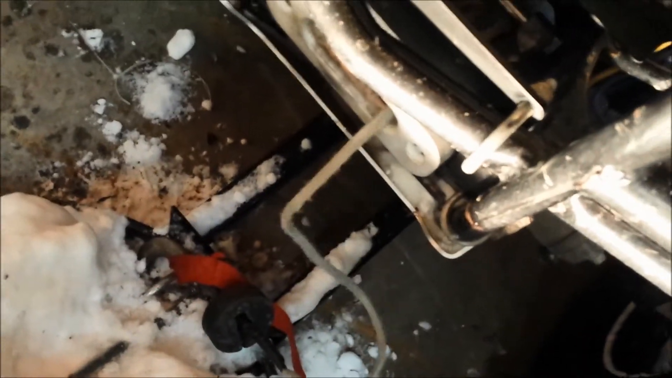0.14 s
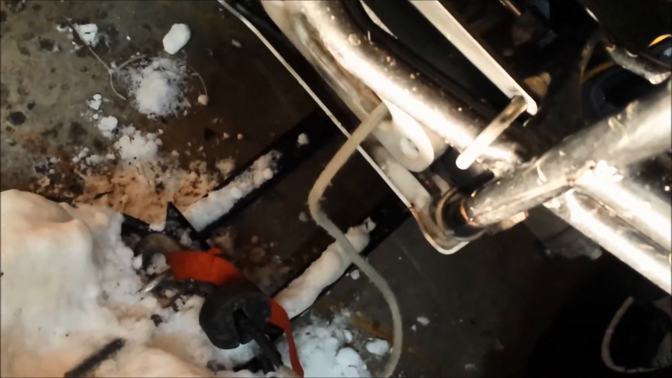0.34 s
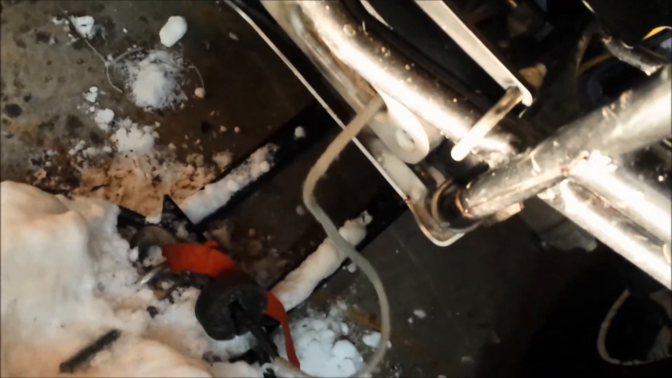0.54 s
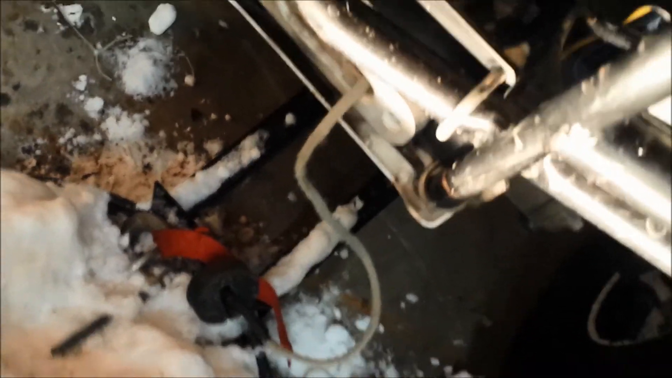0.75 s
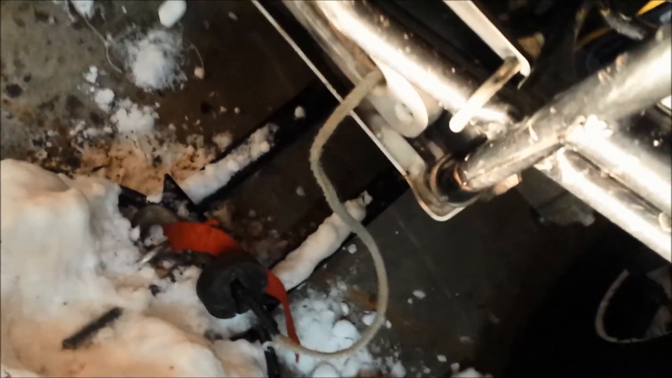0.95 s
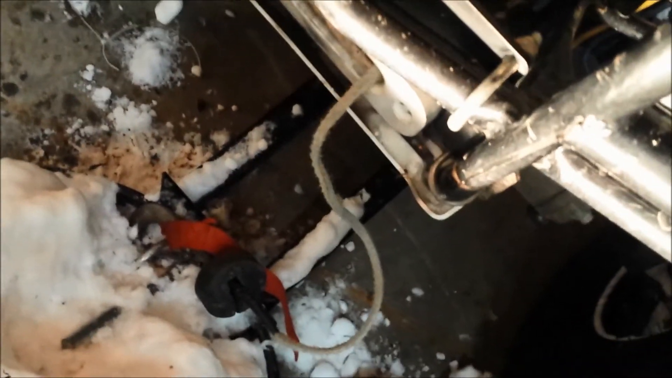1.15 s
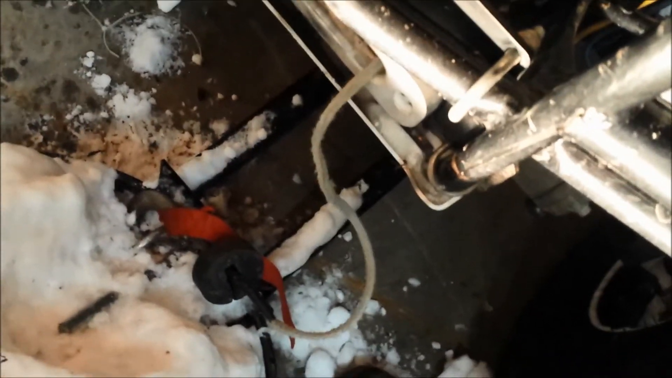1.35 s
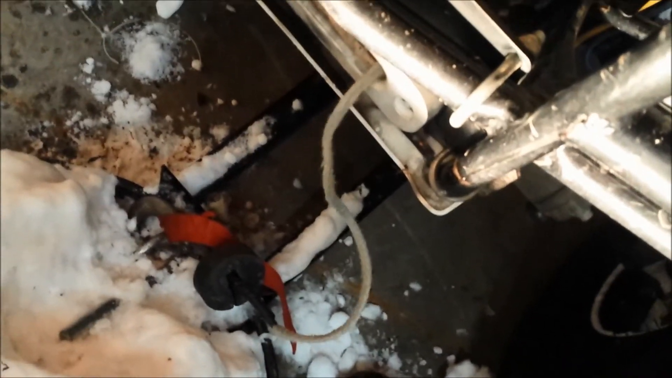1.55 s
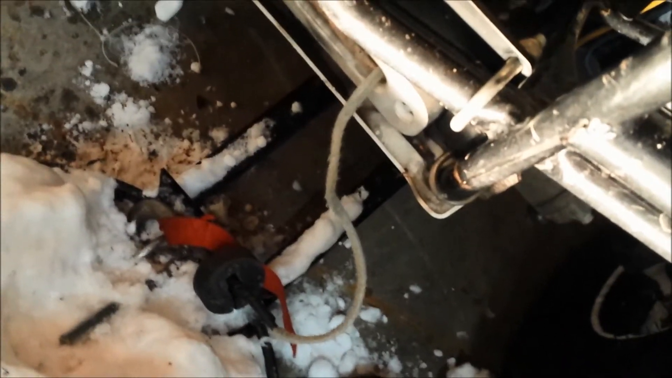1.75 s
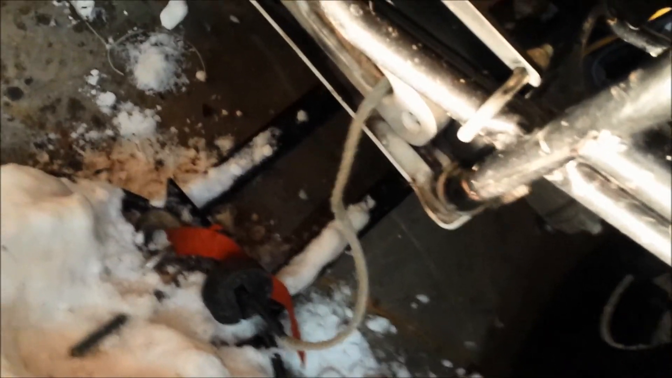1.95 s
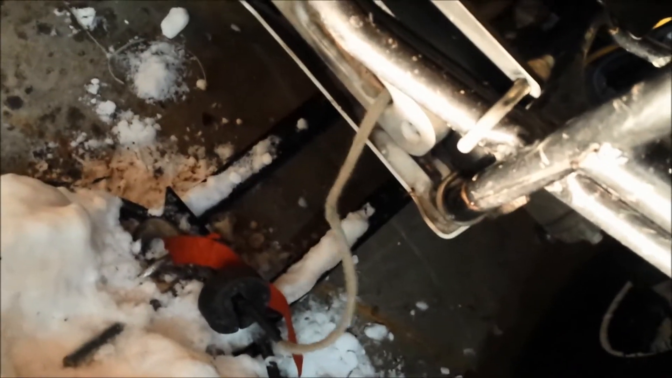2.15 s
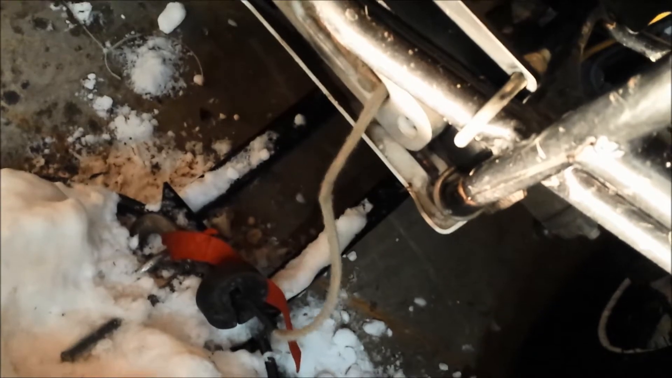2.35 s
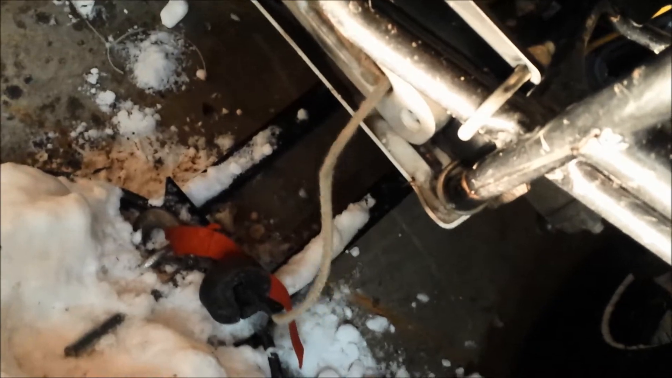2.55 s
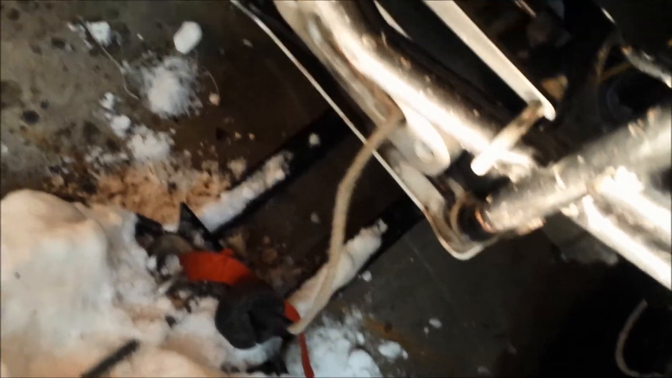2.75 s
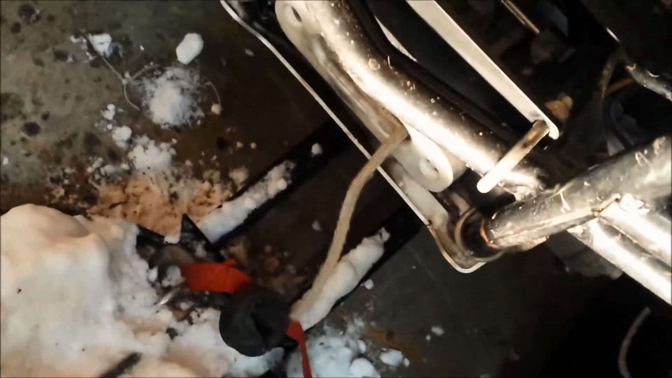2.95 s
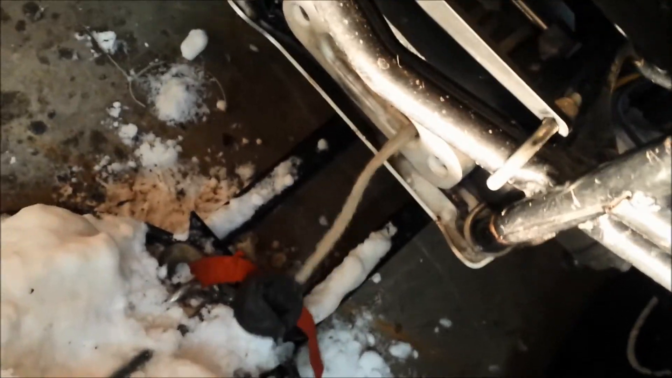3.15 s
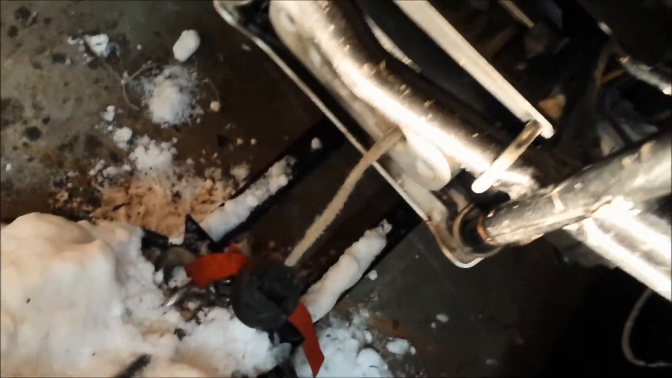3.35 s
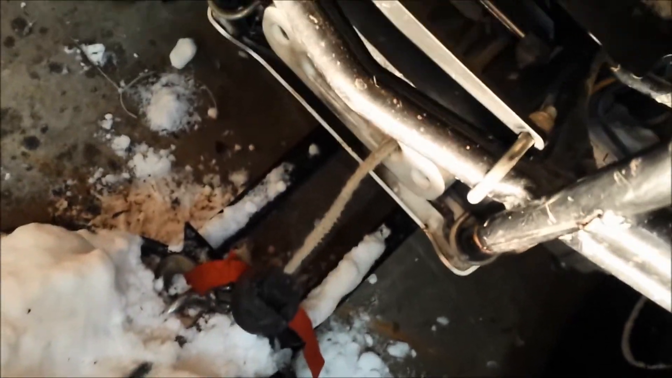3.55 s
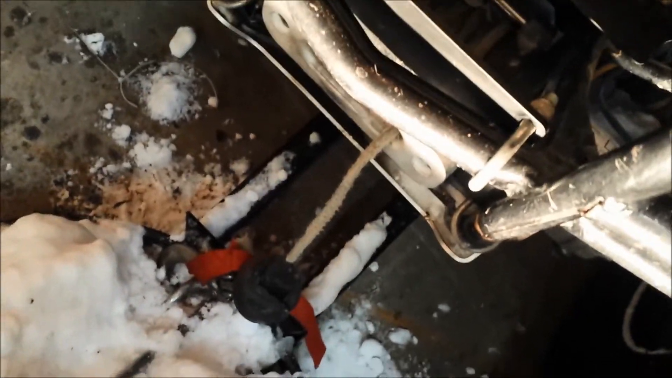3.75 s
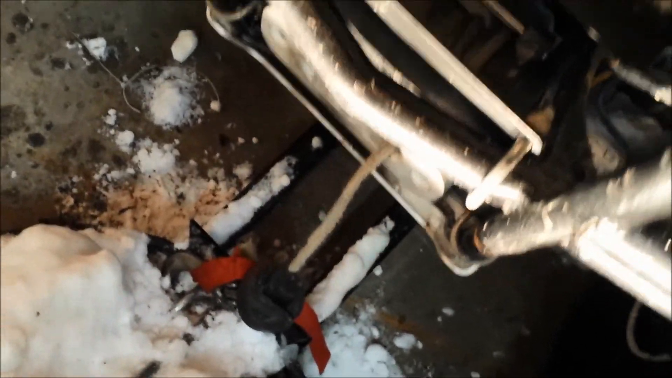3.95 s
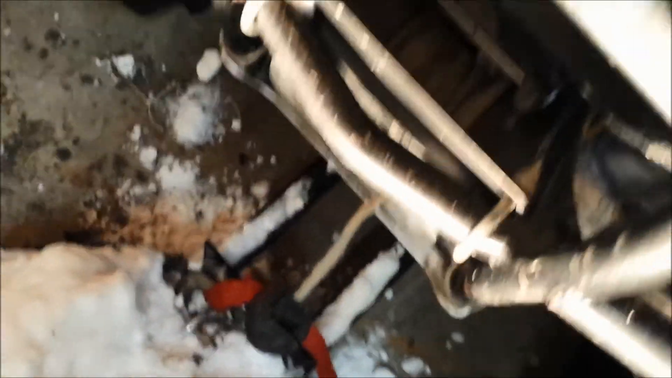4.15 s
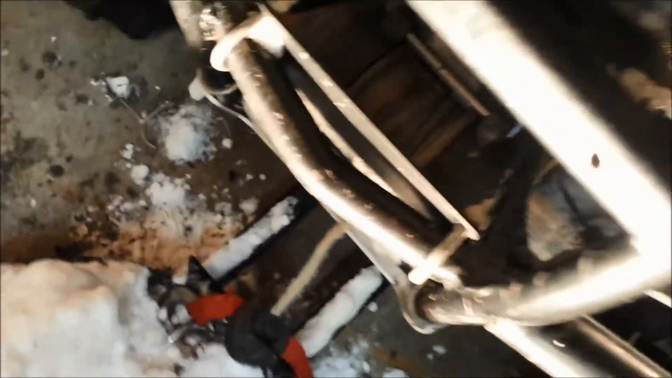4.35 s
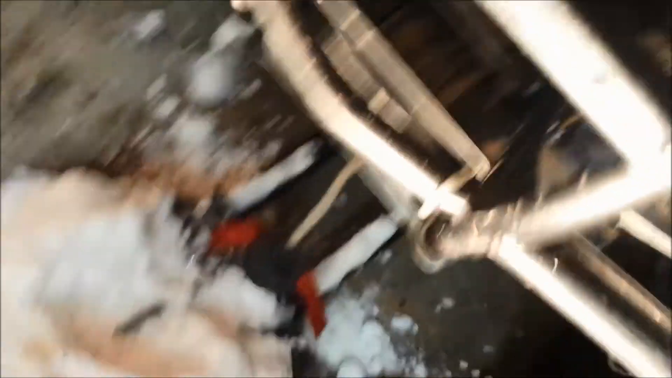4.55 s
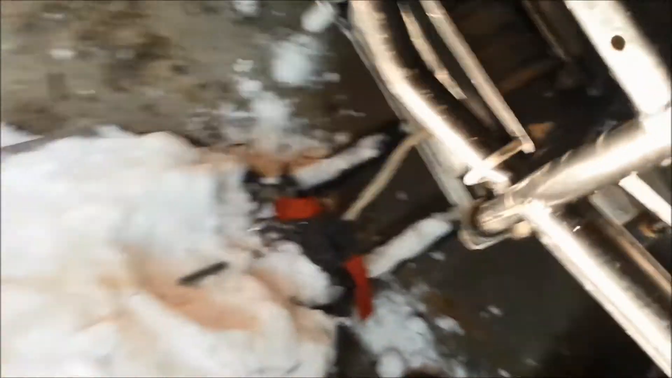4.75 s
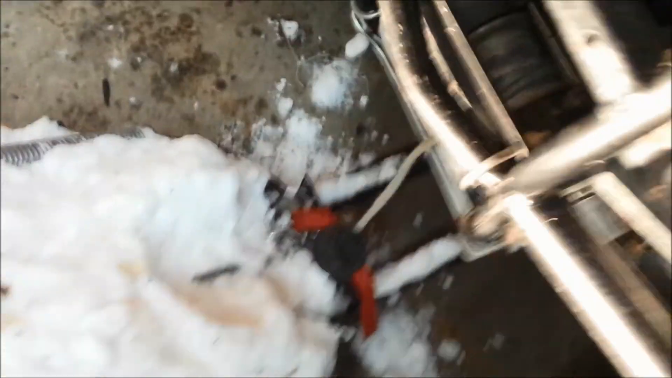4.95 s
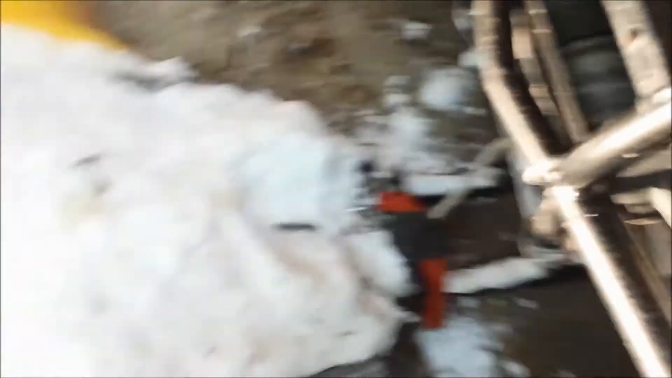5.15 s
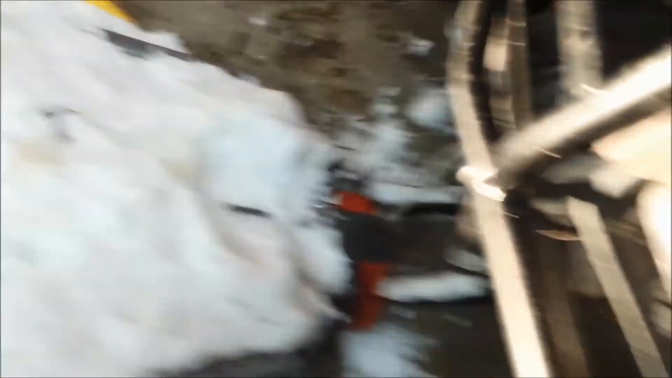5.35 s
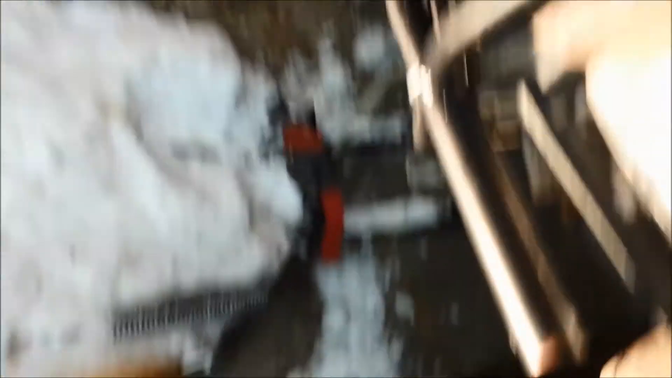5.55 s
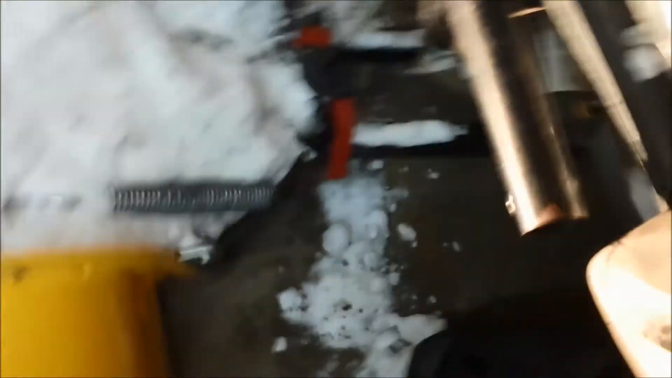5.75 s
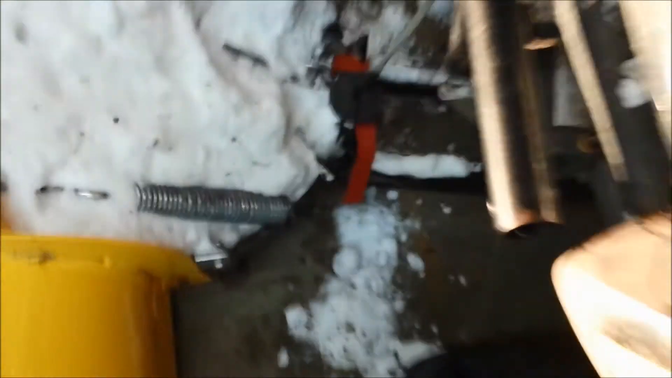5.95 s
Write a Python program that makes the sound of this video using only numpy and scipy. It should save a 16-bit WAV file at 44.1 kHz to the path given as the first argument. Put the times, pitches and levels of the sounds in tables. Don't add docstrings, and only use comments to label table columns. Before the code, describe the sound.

An electric winch whines and grinds steadily as rope ticks onto its drum, stops dead, then quiet cloth rustle and a few scuffs and knocks.

```python
import sys
import numpy as np
from scipy import signal
from scipy.fft import rfft, irfft, next_fast_len
from scipy.io import wavfile
from scipy.ndimage import map_coordinates

SR = 44100
rng = np.random.default_rng(int(sys.argv[2]) if len(sys.argv) > 2 else 0)


def inscribe(sig):
    pcm = np.round(np.clip(np.atleast_2d(sig).T, -1, 1) * 32767)
    wavfile.write(sys.argv[1], SR, pcm.astype(np.int16))


def nominal_scale(level):
    x = np.asarray(level, float) / 20
    return 10 ** x


N = 264149
T = np.arange(N) / SR

STOP_S = 3.3625
TEETH = 11.35
MOTOR_DB, DRUM_DB, HOUSING_DB = -32.5, -9, -5
# (time [s], speed [turns/s])
SHAFT_SPEED = [
    (0, 44.9),
    (.46, 45.15),
    (.9, 44.8),
    (1.6, 44.85),
    (2.1, 45.6),
    (2.5, 45.85),
    (2.8, 45.95),
    (3.1, 45.45),
    (3.4, 45),
]
# (place [share of a turn], level [dB])
HIGH_SPOTS = [(.08, 8.5), (.37, -6), (.6, -1), (.9, -3)]
# (time [s], rumble level [dB])
ROPE_PULL = [
    (0, 2.5),
    (.7, 0.5),
    (1.3, 1),
    (1.9, -0.5),
    (2.3, -2),
    (2.8, 1.5),
    (3.1, 0.5),
    (3.4, 2.5),
]
# (multiple of the tooth rate [-], level [dB], left-right [dB], left lead [rad], blur [Hz])
WHINE_TONES = [(.986, -43, 0, .1, 5), (1.17, -53, -6, .9, 10), (2.001, -46.5, -14, .2, 5.5),
               (3.018, -45, -5, 4.1, 5), (4.12, -56, -4, 5.9, 20)]
WHINE_TURNED_DB = [1, 1.5, 1, 5.5, 5.5]
WHINE_FOLLOWS = [1, 1, 1, .3, 1]
USUAL_TURNS = 45
BEAT, BEAT_DEPTH = .59, .35
# (frequency [Hz], level [dB])
GRIND_COLOUR = [(1200, -27.5), (2000, 6.5), (3000, 3.5), (3700, 6.5), (4500, 1), (6000, 4), (7800, 2.5),
                (8400, -5.5), (9000, -3.5), (10300, 0), (11500, 0), (13000, -14), (13800, -13.5),
                (14700, -36.5)]
# (frequency [Hz], level [dB])
DRUM_COLOUR = [(25, -32), (60, -12), (80, -12), (130, -3.5), (180, -4), (202, -0.5), (230, -3.5),
               (280, -2.5), (380, -10.5), (600, -25.5)]
# (frequency [Hz], width [Hz], level [dB])
HOUSING_MODES = [(463, 43, -2.5), (530, 33, -0.5), (596, 44, -0.5), (640, 79, -2.5), (815, 102, -8.5),
                 (985, 127, -6), (1140, 270, -9), (1450, 65, -4), (1555, 63, 0.5), (1664, 294, -8.5),
                 (2065, 95, -11.5), (2224, 90, -14.5)]
# (frequency [Hz], width [Hz], level [dB])
CASE_BEFORE = [(2900, 150, -1.5), (3950, 150, -7), (4800, 42, 3), (5200, 40, -5), (5200, 88, 0),
               (5810, 70, -2), (5850, 80, -3), (6530, 200, -1), (6960, 77, -5.5), (7210, 150, -1),
               (7680, 100, 3), (8000, 90, 4.5), (9050, 130, -8.5)]
# (frequency [Hz], width [Hz], level [dB])
CASE_AFTER = [(2950, 150, -1.5), (3770, 90, -11.5), (4100, 100, -1), (5440, 88, 0.5), (5800, 150, -2.5),
              (6530, 130, 2), (6720, 91, -3.5), (7320, 200, 3), (7500, 136, 3), (7800, 100, -3.5),
              (9030, 110, 1), (8880, 160, 7.5)]
TURN_S, TURN_LASTS_S = 2.1, 0.43
DIP_HZ, DIP_WIDTH_HZ, DIP_DEPTH = 3620, 110, .38

# (frequency [Hz], left-right [dB])
WINCH_LEAN = [(60, 0.5), (200, 1), (330, 2.5), (500, -.5), (620, -3.5), (950, -5.5), (1150, -6),
              (1400, -2.5), (1700, 1.5), (2000, 0), (2450, -4.5), (3200, -2), (4230, 0.5), (7760, -2.5),
              (14300, -6.0)]
# (frequency [Hz], left lead [ms])
LEFT_LEAD = [(480, .03), (600, .24), (770, .14), (950, .26), (1170, .2), (1400, .29), (1700, .36),
             (1950, .43), (2200, .438)]
# (time [s], left delay [ms], right delay [ms])
FLOOR_DELAY = [(0, 1.38, 1.55), (2, 1.38, 1.55), (2.3, 1.3, 1.51), (3.4, 1.3, 1.51)]
BOUNCE_DB, BOUNCE_FROM_HZ = -6, 2550

# (time [s],
# peak [dB], lowest [Hz], highest [Hz])
SHORT_TICKS = [(0.129, -20.5, 1800, 6560), (.1994, -35, 5000, 8000), (0.3043, -21.5, 3980, 7000),
               (0.846, -40, 5000, 8450), (1.2463, -28.5, 5000, 8500), (2.0896, -23.5, 3000, 7000),
               (2.534, -21, 2500, 7500), (2.9865, -25, 3500, 7000), (3.036, -17, 3400, 7200),
               (3.2288, -22, 5720, 7500), (3.2296, -23, 2010, 2900), (3.251, -29, 4040, 7500),
               (4.862, -47.5, 5000, 13000), (4.912, -55, 3000, 9000), (5.4202, -39, 7050, 14000),
               (5.462, -43, 6600, 8000), (5.535, -51, 3500, 8000), (5.5607, -47, 5000, 14000),
               (5.717, -48, 5000, 9000), (.0837, -25, 1300, 3500), (0.179, -35, 5500, 8200),
               (0.225, -26, 1000, 3000), (.2448, -29, 5000, 8200), (0.5548, -35, 5500, 8200),
               (.7562, -27.5, 5500, 8200), (0.868, -40, 5500, 8200), (1.0909, -35, 6500, 8300),
               (1.114, -29, 6500, 8300), (1.105, -27, 1700, 3200), (1.2012, -28, 5500, 8200),
               (1.269, -33, 5500, 8200), (1.8706, -30, 1800, 3000), (2.3354, -37, 1400, 3000),
               (2.396, -28, 1400, 3000), (2.556, -25.5, 1400, 3000), (2.6005, -34, 1400, 3000),
               (2.7691, -35.5, 1400, 3000), (4.9753, -48, 1000, 9000), (3.378, -32.5, 6800, 8000),
               (2.8095, -33, 5500, 8200), (5.304, -34.5, 9700, 10600), (5.422, -44, 11300, 12600),
               (5.431, -45, 9300, 10300), (5.468, -41.5, 6800, 7800), (5.963, -55, 2500, 5000)]
TICK_T60_S = 0.019
SNAP_S, SNAP_DB = .0006, 6
# (time [s], peak [dB], pitch [Hz], t60 [s])
ROPE_WRAPS = [
    (0.531, -33, 210, .12),
    (.753, -30.5, 200, .05),
    (1.608, -34, 210, 0.21),
    (2.097, -37, 119, 0.048),
    (2.378, -46, 70, 0.13),
    (2.49, -35, 216, 0.042),
    (2.949, -35.5, 190, 0.13),
    (3.002, -35, 127, 0.058),
    (3.24, -34.5, 125, 0.08),
    (3.32, -39, 205, 0.13),
]
# (time [s], peak [dB], body [dB], left-right [dB])
SCUFFS = [(3.9786, -20.5, -18, -3), (4.539, -36, -26, -3), (4.86, -45, -29, -3), (4.975, -39, 4.5, -3.5),
          (4.992, -29.5, -4, -11.5), (5.001, -29, -12.5, -6.5), (5.115, -41, -24, -24),
          (5.291, -16, -2.5, 10), (5.2966, -12.5, -5.5, -2.5), (5.304, -17.5, -3, -15.5),
          (5.322, -18.5, -5.5, -8.5), (5.416, -46, -31, -5), (5.457, -37.5, -25, -13),
          (5.466, -41, -7, -24.5), (5.5092, -45, 10.5, -16), (5.533, -45, 5.5, -7), (5.561, -42, -2, -14),
          (5.965, -41, -6, -7)]
# (frequency [Hz], width [Hz], level [dB])
SCUFF_BODY = [(1330, 610, 15.5), (1770, 1900, 1)]
# (frequency [Hz], level [dB])
GRIT_COLOUR = [(2000, -17), (3500, -8), (5000, -8.5), (7000, 0), (9000, -7.5), (11800, -3), (13300, -16),
               (14700, -18)]
TAP_T60_S = 0.053
SHARP_RISE_S, SOFT_RISE_S = 0.0013, 0.0033
# (time [s], peak [dB], pitch [Hz], t60 [s])
DULL_KNOCKS = [(3.675, -60, 79, 0.049), (3.784, -58, 109.5, 0.016), (3.871, -59, 92, 0.047),
               (3.98, -45.5, 126, 0.03), (3.981, -46, 400, 0.038), (4.095, -49.5, 430, 0.027),
               (4.05, -48, 120, .022), (4.538, -51, 560, 0.037), (4.601, -57, 320, .012),
               (4.734, -53, 350, 0.045), (4.742, -52, 480, 0.062), (4.757, -48, 679, 0.039),
               (5.33, -47, 790, 0.076), (4.976, -31.5, 215, 0.028), (5.021, -48, 170, 0.036),
               (5.14, -51, 594, 0.059), (5.181, -44, 480, 0.043), (5.5, -53, 1400, 0.039),
               (5.514, -55, 1100, 0.046), (5.49, -52, 1250, .04), (4.977, -41, 420, 0.037),
               (4.945, -55, 520, 0.035), (5.292, -42, 580, 0.034), (5.36, -32, 1410, 0.055),
               (5.291, -31, 1350, 0.0247), (5.309, -36.5, 1600, 0.036), (5.293, -41, 3500, .025),
               (5.318, -34.5, 720, 0.036), (4.77, -59, 600, 0.023), (4.545, -63, 950, 0.016),
               (5.565, -62, 1200, 0.019), (5.965, -50, 1150, .015), (4.989, -44, 300, 0.076),
               (5.04, -51.5, 250, .05), (4.1, -59, 160, .04), (4.31, -58, 430, 0.041),
               (5.19, -51, 370, .04), (5.3118, -19.5, 344, 0.014), (5.337, -36, 230, 0.054),
               (5.361, -40, 190, 0.058), (5.411, -45, 460, 0.051), (5.465, -42.5, 503, 0.037),
               (5.537, -43.5, 590, 0.014), (5.612, -48, 150, 0.027), (5.756, -69, 108, 0.031),
               (5.807, -72, 130, 0.069), (5.965, -41, 646, 0.021), (5.966, -40, 110, 0.085)]
KNOCK_RISE = 0.049
PUFF_DB, PUFF_DB_PER_OCTAVE = -6.5, -3
KNOCK_ROOM_HZ = 450

# (time [s], rustle level [dB])
MOVEMENT = [(3.5, -74.5), (3.9, -75.5), (4.0, -65), (4.07, -59.5), (4.17, -52), (4.31, -46), (4.36, -59),
            (4.5, -60), (4.62, -58.5), (4.71, -62), (4.76, -52), (4.81, -57.5), (4.95, -54.5), (5.05, -47),
            (5.4, -47.5), (5.55, -56), (5.76, -50), (5.99, -56)]
# (time [s], peak [dB], rise [s], grit [dB])
SLEEVE_DRAGS = [
    (4.02, -63, 0.034, -20),
    (5.03, -54, 0.034, -29),
    (5.184, -48, 0.023, -10),
    (5.33, -50.5, 0.062, -12),
    (5.519, -53, 0.03, -35),
]
DRAG_FALL = 0.82
RUB_DB, RUB_GROWS, RUMBLE_DB, RUMBLE_GROWS = -64.5, 0.62, -62.5, 0.78
QUIET_DB = -84
# (frequency [Hz], level [dB])
RUSTLE_COLOUR = [(2000, -20), (3500, -8), (5000, -5), (6000, -2), (7800, 0), (9000, -5), (11800, 0),
                 (13300, -5), (14700, -10)]
# (frequency [Hz], level [dB])
RUB_COLOUR = [(300, -16.5), (700, 0.5), (1500, -1), (3000, -4), (5000, -12)]
# (frequency [Hz], level [dB])
RUMBLE_COLOUR = [(15, -51.5), (25, -12.5), (81, -4.5), (177, -11), (205, -12.5), (682, -20.5), (800, -37.5),
                 (1040, -65.5), (1760, -120)]

# (frequency [Hz], t60 [s])
ROOM_DECAY = [(100, 0.74), (300, 0.44), (550, 0.31), (1000, 0.33), (4000, 0.33), (8000, 0.36),
              (14000, 0.41)]
# (frequency [Hz], likeness [0-1])
PORT_LIKENESS = [(30, .2), (60, .62), (130, .93), (220, .88), (340, .6), (500, .75), (700, .55), (1300, 0)]
# (frequency [Hz], width [Hz], level [dB])
PORT_MODES = [
    [(6620, 1780, 12), (11300, 1500, -5)],
    [(7320, 2220, 12.4), (12240, 1500, 1.5)],
]
TOP_HZ = 14720


def unit(x):
    return x / np.sqrt(np.mean(x ** 2) + 1e-20)


def along(points, hz):
    f, v = np.transpose(points)
    return np.interp(np.log(hz + 1), np.log(f + 1), v)


def curves(rows):
    s, *cols = np.transpose(rows)
    return [np.interp(T, s, c) for c in cols]


def wobble(rate):
    knots = rng.standard_normal(int(N * rate / SR) + 4)
    return map_coordinates(knots, [T * rate])


def filtered(x, response):
    m = next_fast_len(x.shape[-1] + 8192)
    spectrum = rfft(x, m) * response(np.fft.rfftfreq(m, 1 / SR))
    return irfft(spectrum, m)[..., :x.shape[-1]]


def modes(table, f):
    total = 0
    for k, (centre, width, db) in enumerate(table):
        damping = 1j * f * width
        total = total + (-1) ** k * nominal_scale(db) * damping / (centre * centre - f * f + damping)
    return total


def coloured(x, spectrum):
    return unit(filtered(x, lambda hz: nominal_scale(along(spectrum, hz))))


def strikes(rows, length):
    out = np.zeros((2, N + length))
    for s, sound in rows:
        out[:, round(s * SR):][:, :length] += sound
    return out[:, :N]


def both_ports(lean_db):
    return nominal_scale([[lean_db / 2], [-lean_db / 2]])


def gears(repeat=.4, turns_alike=7, width=.032):
    turn = np.cumsum(curves(SHAFT_SPEED)[0]) / SR
    surface = rng.standard_normal((300, 1024))
    worn = unit(map_coordinates(surface, [turn / turns_alike, turn % 1 * 1024], mode="grid-wrap"))
    rub = np.sqrt(repeat) * worn + np.sqrt(1 - repeat) * rng.standard_normal(N)
    scatter_db = rng.normal(0, 2.4, (300, len(HIGH_SPOTS)))[turn.astype(int)]
    swell = 0
    for k, (at, db) in enumerate(HIGH_SPOTS):
        swell = swell + nominal_scale(db + scatter_db[:, k]) * np.exp(-((turn % 1 - at) / width) ** 2 / 2)
    return rub * (1 + swell)


def gear_grind(late):
    teeth = coloured(gears(), GRIND_COLOUR)
    before = filtered(teeth, lambda f: 1 + np.abs(modes(CASE_BEFORE, f)))
    after = filtered(teeth, lambda f: 1 + np.abs(modes(CASE_AFTER, f)))
    before = filtered(before, lambda f: 1 - DIP_DEPTH * np.exp(-((f - DIP_HZ) / DIP_WIDTH_HZ) ** 2))
    return nominal_scale(-7.5 + 0.14 * wobble(34)) * unit((1 - late) * before + late * after)


def housing_drone():
    ring = unit(filtered(rng.standard_normal(N), lambda f: modes(HOUSING_MODES, f)))
    return nominal_scale(HOUSING_DB + 0.5 * wobble(24)) * ring


def drum_rumble():
    pull_db, = curves(ROPE_PULL)
    return nominal_scale(DRUM_DB + pull_db + 1.2 * wobble(14)) * coloured(rng.standard_normal(N), DRUM_COLOUR)


def gear_whine(on, late):
    angle = 2 * np.pi * TEETH * np.cumsum(curves(SHAFT_SPEED)[0]) / SR
    usual_angle = 2 * np.pi * TEETH * USUAL_TURNS * T
    throb = 1 + BEAT_DEPTH * np.sin(BEAT / TEETH * angle)
    for tone, grows_db, follows in zip(WHINE_TONES, WHINE_TURNED_DB, WHINE_FOLLOWS):
        multiple, db, lean_db, lead, blur_hz = tone
        blur = 2 * np.pi * blur_hz * np.cumsum(wobble(40)) / SR
        phase = multiple * (follows * angle + (1 - follows) * usual_angle) + blur
        size = on * nominal_scale(db + grows_db * late + 3 * wobble(70) + .6 * wobble(8)) * throb
        yield size, phase, lean_db, lead


def placed(x, lean_db):
    def port(hz, side):
        lead_phase = np.pi * hz * along(LEFT_LEAD, hz) / 1000
        return nominal_scale(side * lean_db(hz) / 2) * np.exp(side * 1j * lead_phase)
    return filtered(x, lambda hz: np.array([port(hz, 1), port(hz, -1)]))


def bounced(pair):
    late = []
    for x, ms in zip(pair, curves(FLOOR_DELAY)):
        late.append(map_coordinates(x, [np.arange(N) - ms * SR / 1000]))
    return pair + filtered(np.array(late), lambda f: nominal_scale(BOUNCE_DB) / (1 + (BOUNCE_FROM_HZ / (f + 1)) ** 4))


def winch():
    on = np.clip((STOP_S - T) / 0.0015, 0, 1)
    late = np.clip((T - TURN_S) / TURN_LASTS_S + .5, 0, 1)
    body = on * nominal_scale(MOTOR_DB - 4) * (gear_grind(late) + housing_drone() + drum_rumble())
    near = nominal_scale(0.5) * bounced(placed(body, lambda hz: along(WINCH_LEAN, hz) * 2.03))
    for size, phase, lean_db, lead in gear_whine(on, late):
        near = near + size * both_ports(lean_db) * np.sin([phase + lead, phase])
        body = body + 0.25 * size * np.sin(phase)
    return near, body


def ticks():
    t, rows = T[:1024], []
    fade = nominal_scale(-60 * t / TICK_T60_S + SNAP_DB * np.exp(-t / SNAP_S))
    for s, db, low_hz, high_hz in SHORT_TICKS:
        band = signal.butter(2, [low_hz, high_hz], "band", fs=SR, output="sos")
        noise = rng.standard_normal((2, 1024)) + rng.standard_normal(1024)
        crack = signal.sosfilt(band, noise * fade)
        crack = crack / np.abs(crack).max(axis=1, keepdims=True)
        lean_db = along(WINCH_LEAN, np.sqrt(low_hz * high_hz))
        rows.append((s, nominal_scale(db + lean_db * np.array([[1], [-1]])) * crack))
    return strikes(rows, length=1024)


def taps():
    t, rows = T[:4096], []
    fade = nominal_scale(-60 * t / TAP_T60_S)
    sharp = (1 - np.exp(-t / SHARP_RISE_S)) * fade
    soft = (1 - np.exp(-t / SOFT_RISE_S)) * fade
    for s, db, body_db, lean_db in SCUFFS:
        grit = coloured(rng.standard_normal((2, 4096)), GRIT_COLOUR) * sharp
        body = filtered(rng.standard_normal((2, 4096)) * soft, lambda f: modes(SCUFF_BODY, f))
        rows.append((s, nominal_scale(db - 7.5) * both_ports(lean_db) * (nominal_scale(-9.5) * grit + nominal_scale(body_db) * body)))
    return strikes(rows, length=4096)


def knocks():
    t, rows = T[:8192], []
    for s, db, hz, t60 in DULL_KNOCKS + ROPE_WRAPS:
        shape = (1 - np.exp(-t / (KNOCK_RISE * t60))) * nominal_scale(-60 * t / t60)
        noise = blended(rng.standard_normal((2, 8192)))
        puff = unit(filtered(noise, lambda f: modes([(hz * 1.43, hz * 1.95, 0)], f) ** 2))
        puff_db = PUFF_DB + PUFF_DB_PER_OCTAVE * np.log2(hz / 200)
        swing = np.sin(2 * np.pi * hz * t)
        rows.append((s, nominal_scale(db) * shape / shape.max() * (swing + nominal_scale(puff_db) * puff)))
    return strikes(rows, length=8192)


def cloth():
    move_db, = curves(MOVEMENT)
    rub_db = RUB_DB + RUB_GROWS * (move_db + 55) + np.minimum(move_db - QUIET_DB - 10, 0)
    rustle_size, rub_size = nominal_scale(move_db - 7), nominal_scale(rub_db)
    for s, db, rise, grit_db in SLEEVE_DRAGS:
        swell = nominal_scale(db) * np.exp(-np.where(T < s, (s - T) / rise, (T - s) / (DRAG_FALL * rise)))
        rustle_size = rustle_size + swell * nominal_scale(grit_db)
        rub_size = rub_size + swell
    crackle = nominal_scale(0.74 * np.minimum(rng.exponential(1, N // 64 + 1), 5)).repeat(64)[:N]
    rustle = coloured(crackle * rng.standard_normal((2, N)), RUSTLE_COLOUR) * rustle_size * nominal_scale(wobble(25))
    rub = coloured(blended(rng.standard_normal((2, N))), RUB_COLOUR) * rub_size * nominal_scale(1.5 * wobble(20))
    rumble_size = nominal_scale(RUMBLE_DB + RUMBLE_GROWS * (move_db + 56) + 1.3 * wobble(13))
    rumble = coloured(blended(rng.standard_normal((2, N))), RUMBLE_COLOUR) * rumble_size
    return rustle + rub + rumble


def blended(pair):
    def shares(hz):
        turn = np.arccos(np.clip(along(PORT_LIKENESS, hz), -1, 1)) / 2
        return np.array([np.cos(turn), np.sin(turn)])
    mid, side = filtered(pair, shares)
    return np.array([mid + side, mid - side])


def room_tail():
    hz, t, z = signal.stft(rng.standard_normal((2, SR // 2)), SR, nperseg=256)
    fade = nominal_scale(-60 * t / along(ROOM_DECAY, hz)[:, None])
    tail = blended(signal.istft(z * fade, SR, nperseg=256)[1])
    return tail / np.linalg.norm(tail, axis=1, keepdims=True)


def room(x, piece=6144):
    out = np.zeros((2, N + 2 * SR))
    fade = np.sqrt(np.hanning(2 * piece))
    wide = np.pad(x, (piece, 2 * piece))
    for start in range(0, N + piece, piece):
        part = wide[start:start + 2 * piece] * fade
        echo = signal.fftconvolve(part[None], room_tail(), axes=1)
        out[:, start:start + echo.shape[1]] += echo
    return out[:, piece - 260:][:, :N]


def scene():
    near, body = winch()
    sharp, dull = ticks() + taps(), knocks()
    low_knocks = filtered(dull, lambda f: 1 / (1 + (f / KNOCK_ROOM_HZ) ** 2))
    struck = (nominal_scale(-10.5) * sharp + nominal_scale(-6) * low_knocks).mean(axis=0)
    return near + sharp + dull + nominal_scale(3.5) * room(body + struck) + cloth()


def roll_off(x):
    return signal.sosfilt(signal.butter(12, 14720, fs=SR, output="sos"), x)


def record(dry):
    def ports(f):
        return np.array([np.prod([1 + modes([peak], f) for peak in port], axis=0) for port in PORT_MODES])
    mix = filtered(dry, lambda f: ports(f) * (f < TOP_HZ))
    return roll_off(mix)


dry = scene()
out = record(dry)
inscribe(out)
```